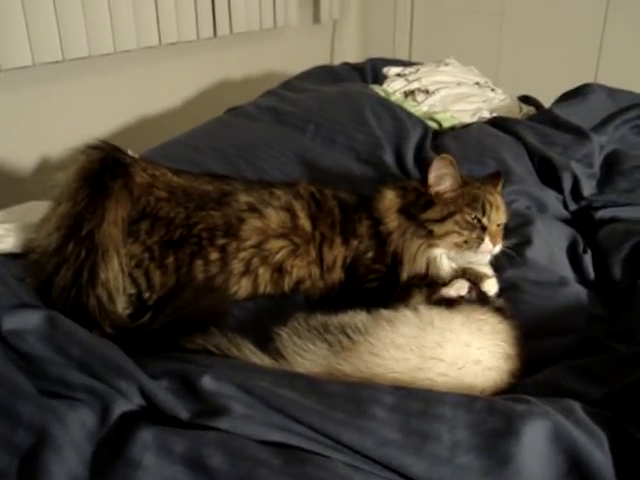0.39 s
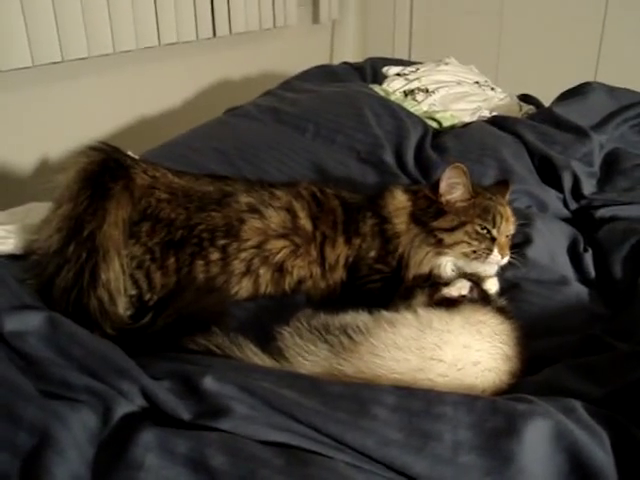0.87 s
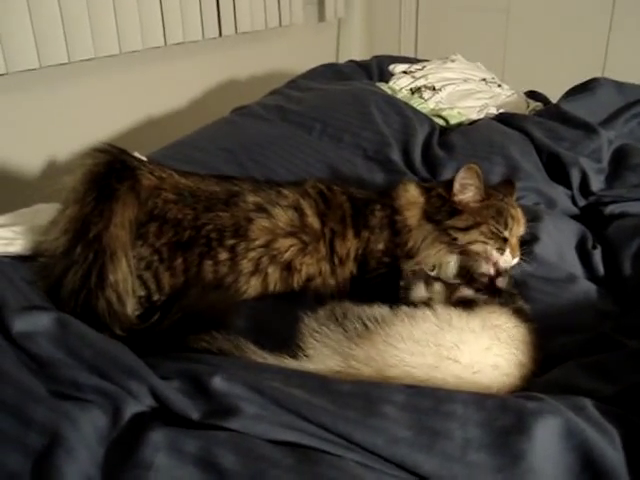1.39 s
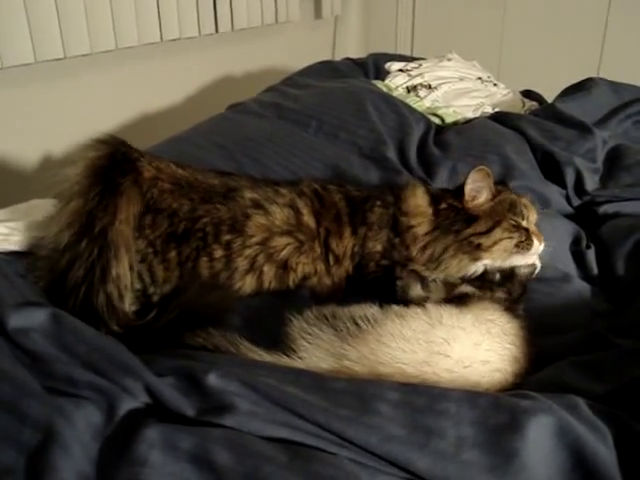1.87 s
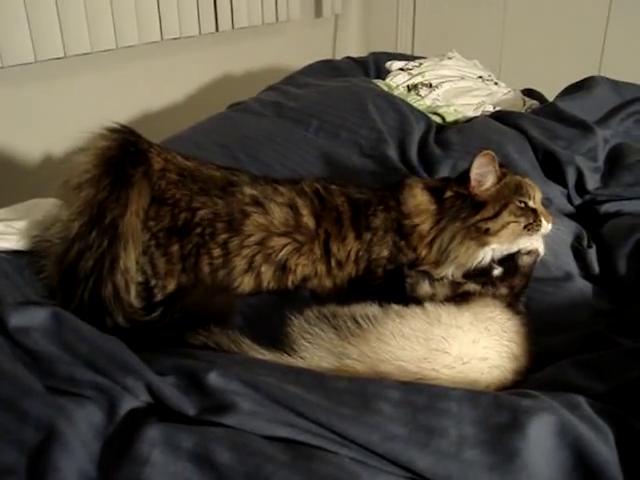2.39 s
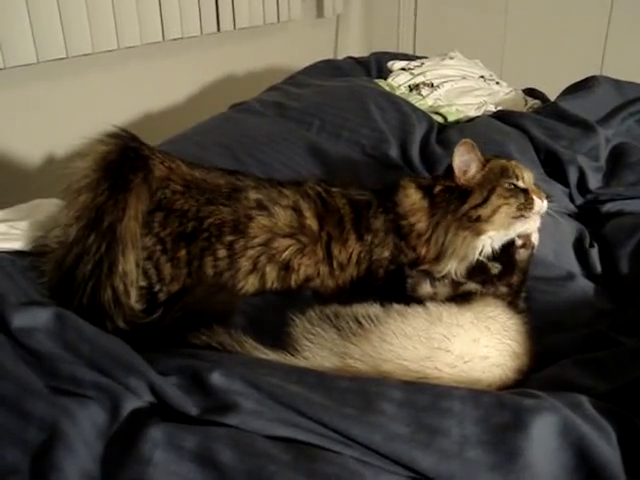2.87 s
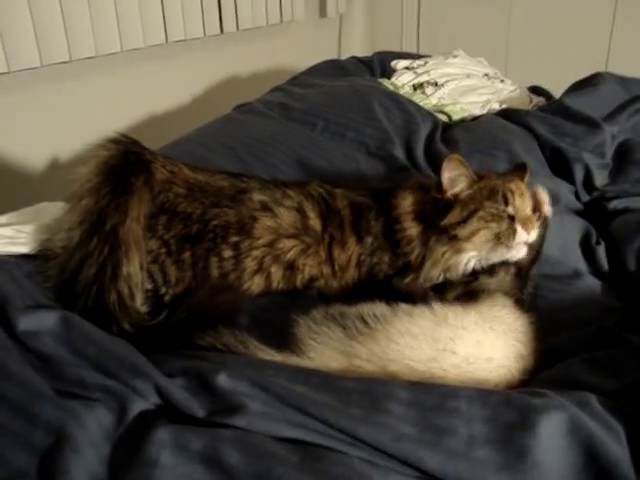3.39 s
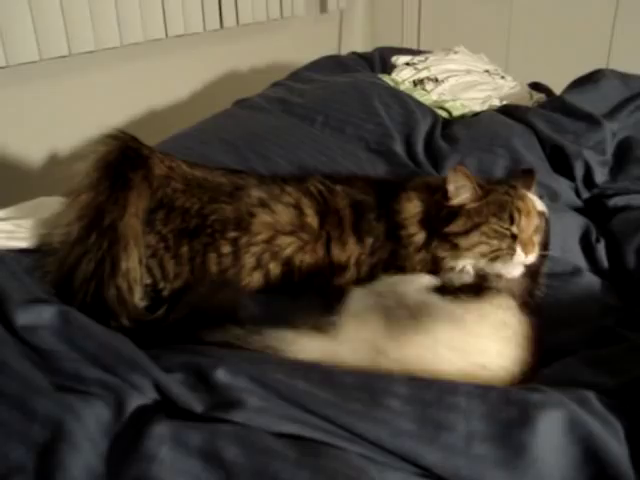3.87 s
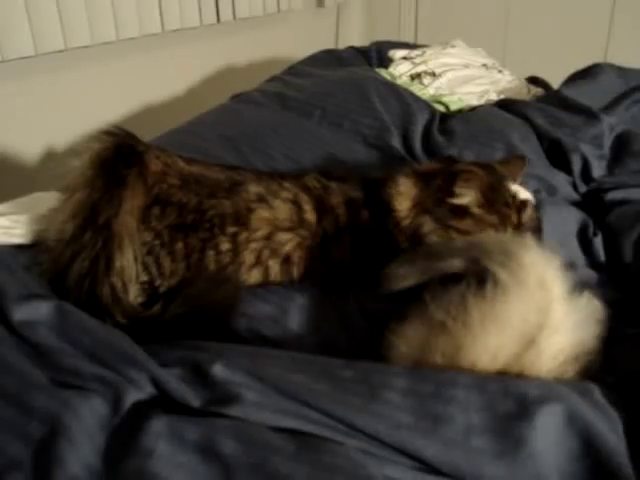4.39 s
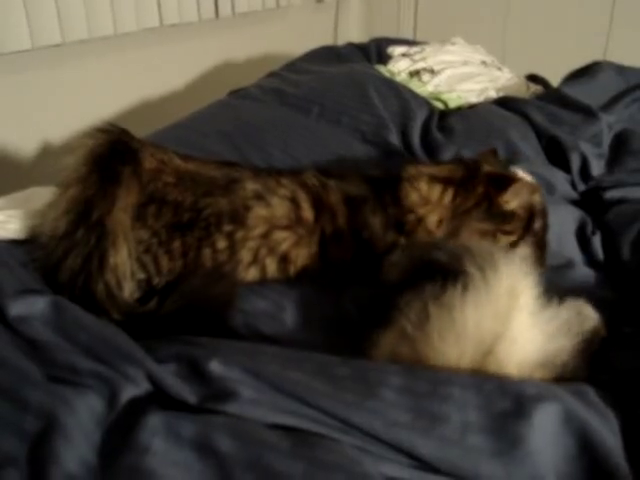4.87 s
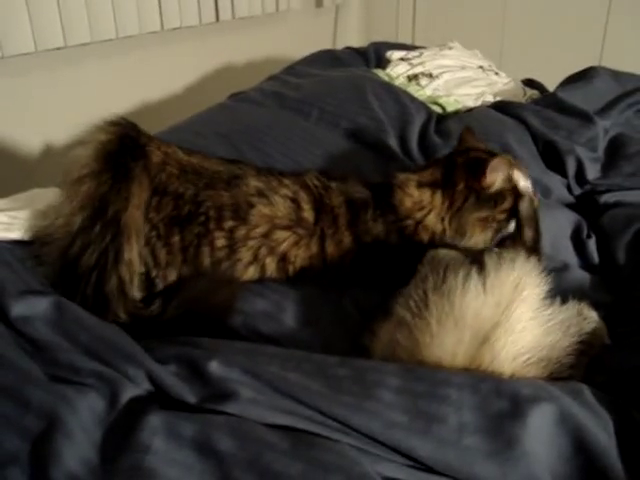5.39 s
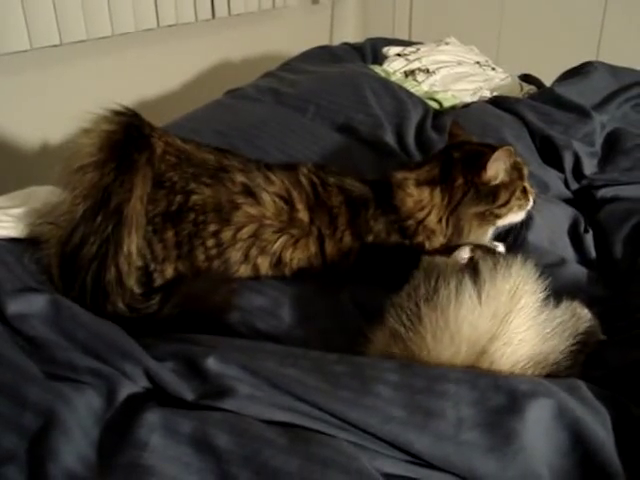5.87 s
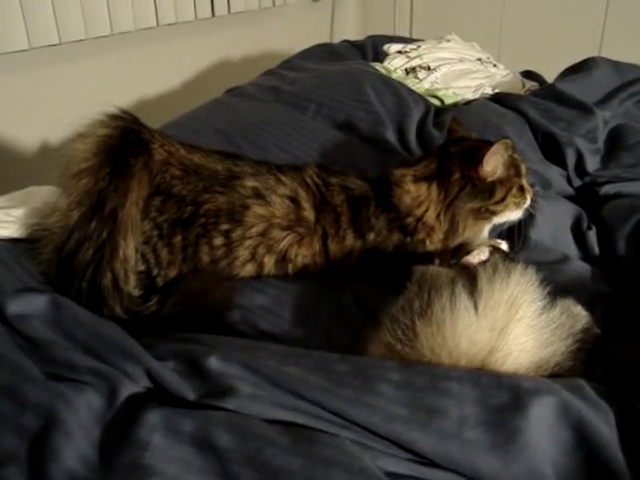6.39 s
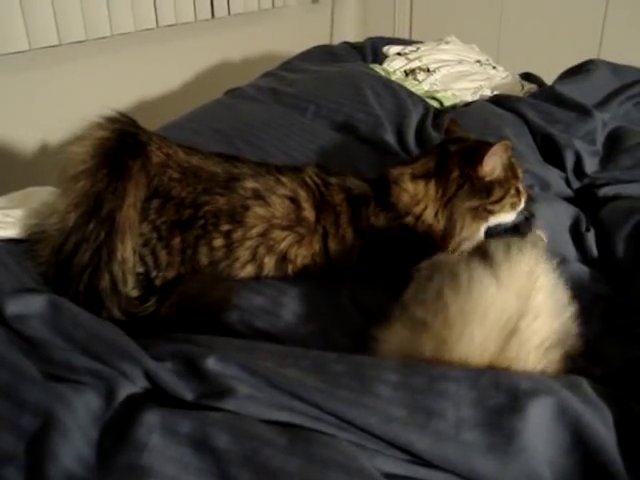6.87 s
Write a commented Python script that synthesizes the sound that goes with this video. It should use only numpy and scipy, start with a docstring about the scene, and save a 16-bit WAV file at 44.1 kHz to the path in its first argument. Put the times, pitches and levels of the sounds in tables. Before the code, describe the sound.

Sharp plastic clicks and knocks of a handled camera over soft hiss, then a cat gives two short trilled calls in a quiet bedroom.

```python
"""Room rumble, camera hiss and buzz lie under everything, with faint wavering bands: coloured noise and sines.
From the start a hand shifts on the plastic camera body: sharp clicks excite its resonances, fingers slide,
loose parts rattle, and two blows set a small metal part ringing.
Then a cat on a bed gives two short trilled calls, built from harmonics and breath noise, in a quiet room.
Between the calls and after them the bedding rustles in bursts of grainy noise."""
import sys
import numpy as np
from scipy import signal
from scipy.fft import rfft, irfft, next_fast_len
from scipy.io import wavfile
from scipy.ndimage import map_coordinates

SR = 44100
rng = np.random.default_rng(int(sys.argv[2]) if len(sys.argv) > 2 else 0)


def attenuation_scalar(level_db):
    """Turn a level in dB into a linear amplitude multiplier (20 dB per decade)."""
    decades = np.asarray(level_db, float) / 20
    return 10 ** decades


def wav_out(sig):
    """Save sig, one row per channel (or a flat mono array), as 16-bit PCM at SR to the path in sys.argv[1]."""
    wavfile.write(sys.argv[1], SR, np.round(np.clip(np.atleast_2d(sig).T, -1, 1) * 32767).astype(np.int16))


N = 319697
T = np.arange(N) / SR  # time of each sample in seconds
SLIDE_RISE_S, SLIDE_FALL_S = 0.0021, 0.006  # slides and rattles: seconds per 20 dB
THROAT_RISE_S, THROAT_FALL_S = 0.026, 0.027  # rough throat sounds: seconds per 20 dB


def unit(x):
    """Scales a sound to an rms of 1."""
    return x / np.sqrt(np.mean(x ** 2) + 1e-20)


def curves(rows):
    """Draws straight lines between the rows: one curve for each column after the time."""
    s, *cols = np.transpose(rows)
    return [np.interp(T, s, c) for c in cols]


def wobble(rate):
    """A smooth random curve through `rate` random points a second."""
    points = rng.standard_normal(int(N * 200 / SR) + 4)
    return map_coordinates(points, [T * rate])


def filtered(x, response):
    """Multiplies the spectrum of x by a response that depends on frequency."""
    m = next_fast_len(N + 8192)  # room at the end for the filter to ring out
    return irfft(rfft(x, m) * response(np.fft.rfftfreq(m, 1 / SR)), m)[:N]


def noise(spectrum):
    """Noise of rms 1, coloured by points of (Hz, dB)."""
    f, level = np.transpose(spectrum)

    def colour(hz):
        return attenuation_scalar(np.interp(np.log(hz + 1), np.log(f + 1), level))

    return unit(filtered(rng.standard_normal(N), colour))


def resonant(x, peaks):
    """Adds up (Hz, width, dB) resonances; neighbours alternate in sign, so no notch opens between them."""
    def response(f):
        return sum((-1) ** k * attenuation_scalar(db) * 1j * f * w / (c * c - f * f + 1j * f * w)
                   for k, (c, w, db) in enumerate(peaks))

    return filtered(x, response)


def twice(x, peaks):
    """Passes x through the resonances twice, so the sides of each peak fall steeply."""
    return resonant(resonant(x, peaks), peaks)


def strokes(rows, rise_s, fall_s):
    """Gain of (start, length, dB) strokes that swell, hold and fade; the times are for 20 dB."""
    gain = 0
    for s, length, db in rows:
        steps_away = np.maximum((s - T) / rise_s, (T - s - length) / fall_s)
        gain = gain + attenuation_scalar(db - 20 * np.maximum(0, steps_away))
    return gain


def hiss():
    """Room rumble and microphone hiss: coloured noise whose level drifts slowly."""
    # Colour of the noise. Each row: frequency in Hz, relative level in dB.
    floor = [(12, -34), (20, -8), (86, -5.5), (115, -2.5), (146, -4.5), (199, -3.5), (295, -3.5), (582, 0),
             (2330, -15.5), (2870, -17.5), (4590, -17.5), (5660, -18), (7350, -19), (8160, -19.5),
             (10300, -22.5), (13400, -77), (22000, -120)]
    return attenuation_scalar(-52.5 + 0.72 * wobble(3.153)) * noise(floor)


def buzz():
    """The camera electronics hum at multiples of the frame rate, each tone wavering a little."""
    frame_hz = 29.97
    # Tones of the electronics. Each row: multiple of the frame rate, rms level in dB before the wavering.
    tones = [(4, -71), (5, -80), (7, -71), (8, -68), (9, -69), (260, -88), (261, -82), (262, -73),
             (263, -74), (264, -83), (266, -89), (268, -86), (269, -87), (270, -79), (271, -69), (272, -84),
             (273, -86)]
    total = 0
    for k, db in tones:
        level = np.sqrt(2) * attenuation_scalar(db + 0.34 * wobble(9.0))
        total = total + level * np.sin(2 * np.pi * (k * frame_hz * T + rng.random()))
    return total


def whirr():
    """Faint narrow bands of noise that waver."""
    # Narrow bands. Each row: frequency in Hz, width of one filter pass in Hz, level in dB before the wavering.
    bands = [(2560, 260, -74), (2930, 330, -71), (3790, 300, -73)]
    total = 0
    for hz, width, db in bands:
        band = unit(twice(rng.standard_normal(N), [(hz, width, 0)]))
        total = total + attenuation_scalar(db + 3.1 * wobble(7.4)) * band
    return total


def flutter():
    """A thin band of noise comes and goes in flickering spells."""
    # Spells of the band. Each row: start in seconds, length in seconds, level in dB before the flicker.
    spells = [(0.32, 0.089, -69), (0.92, .3, -75), (1.45, 0.11, -67), (2.27, 0.26, -69), (2.75, 0.12, -69),
              (3.1, .33, -68), (3.56, 0.43, -69), (4.09, .3, -67.5), (4.46, .2, -73), (4.85, 0.41, -68),
              (5.4, 0.34, -69.5), (6.2, 0.24, -70), (6.55, 0.31, -68), (7.1, .15, -74)]
    # The thin band. Each row: frequency in Hz, width of one filter pass in Hz, level in dB.
    thin = [(5740, 230, 0)]
    edge_s = 0.11  # seconds per 20 dB
    flicker = attenuation_scalar(2.7 * wobble(30))
    return strokes(spells, edge_s, edge_s) * flicker * unit(twice(rng.standard_normal(N), thin))


def click_forces():
    """Each click is a snap with a short gritty tail; faint noise is heard swelling just before it."""
    # Clicks of the hand on the camera. Each row: time in seconds, force in dB, then levels over
    # the force in dB of shell, hollow knock and bright crack.
    hits = [(0.2273, -43, -5, 3, -20), (0.2347, -45, 8, -3, -11), (0.2407, -35, -3, -6, 12.5),
            (0.244, -35.5, -4, 0, -8), (0.246, -36, 0, -1, 3), (0.2492, -42, 4, 2, -20),
            (0.3181, -42.5, -12, 1, -25), (0.516, -47, -14, 15, -3), (0.6206, -32, -0.5, -3, -8),
            (0.735, -30.5, -13, -4, -24), (1.2336, -41.5, -2, -6, 4), (1.2377, -43, 2, -13, 3),
            (1.2423, -45, 5, 3, 13), (1.2567, -40, -8, 1.5, -10), (1.282, -49, 4, -10, 3),
            (1.2922, -54, 7, -10, -4), (1.3097, -47, -16, 12, -6), (1.3266, -39, -30, 4, -25),
            (1.3342, -37, -2, 3, -28), (1.3424, -20.5, 7, -6.5, 9), (1.358, -20.5, 9.5, -0.5, 11.5),
            (1.3637, -24, -10, -4, -35), (1.4523, -43.5, 4, -8, -4), (1.647, -37, -2, -3, -9),
            (1.662, -33.5, -5, -9, -3.5), (1.915, -25, 1.5, -6.5, -3), (2.0358, -45.5, 9, -18, 17),
            (2.0395, -27.5, 1, -6, -10), (2.2151, -22, -20, -1, -5.5), (2.2195, -20, -14, -6, -8),
            (2.2233, -24, 0, -9, 9.5), (2.229, -51, 0, -1, -25), (2.2345, -58, -10, 7, -25),
            (2.2385, -57, -13, -4, -25), (2.2435, -54, 0, 7, -25), (2.2465, -50.5, -12, 15, -25),
            (2.2535, -48, -14, -8, -23), (2.308, -42.5, -27, 12.5, -23), (2.328, -51, -22, 16, -20),
            (2.3505, -53.5, -13, 15.5, -10), (3.3345, -53, 7.5, -12, -6), (3.4504, -49, 2, 11.5, 3),
            (3.4552, -42, 4, -7, 10.5), (3.4643, -42, 6, -10, 4), (3.472, -41, 3, 4, 2),
            (3.4872, -30, 0, -1, -8), (3.4903, -26, 7, -0.5, 5), (3.5087, -20.5, -21, -4.5, -11),
            (3.5326, -32, -5, -10, -8), (3.8351, -30, 1, -6, -9)]
    # Gritty tail, for hollow, rim, shell and bright edge: start level under the snap in dB.
    grit_db = [-22, -16.5, -23, -16.5]
    # The same four parts: time in seconds for the tail to fall by 60 dB.
    grit_t60 = [0.036, 0.02, 0.016, 0.0091]
    force = np.zeros((4, N + SR))
    t = np.arange(SR // 16) / SR
    early = SR // 200  # samples of faint noise heard ahead of the snap
    after = t - early / SR
    tail = attenuation_scalar(grit_db)[:, None] * attenuation_scalar(-60 * after / np.array(grit_t60)[:, None])
    pre_echo = 0.04 * attenuation_scalar(20 * after / 0.003)  # swells by 20 dB in 3 ms
    noise_gain = np.where(after > 0, tail, pre_echo)
    for s, db, shell_db, hollow_db, bright_db in hits:
        levels = db + np.array([hollow_db, 0, shell_db, bright_db])
        snap = noise_gain * rng.standard_normal(len(t)) - (after == 0)
        force[:, round(s * SR) - early:][:, :len(t)] += attenuation_scalar(levels)[:, None] * snap
    return force[:, :N]


def camera_body(force):
    """The forces ring the hollow, rim, shell and bright edge; the hollow also rings on in its cavity."""
    # Resonances of the hollow inside, the rim, the shell, the bright edge and the cavity.
    # Each row: frequency in Hz, width in Hz, level in dB (hollow and rim: for one of two filter passes).
    hollow = [(753, 526, -1.5), (1326, 505, -1.5)]
    rim = [(2080, 2020, 0)]
    shell = [(2720, 180, 0), (3200, 800, -6), (3850, 500, -8)]
    bright = [(4700, 850, 5.5), (6700, 1190, 4), (8620, 1300, 0.5)]
    cavity = [(1090, 110, 0)]
    cavity_db = -9
    blow = 1. * (np.arange(N) == 0)  # a single-sample blow, to scale each response to a peak of 1
    parts = (twice, hollow), (twice, rim), (resonant, shell), (resonant, bright)
    out = 0
    for push, (ring, peaks) in zip(force, parts):
        out = out + ring(push, peaks) / np.abs(ring(blow, peaks)).max()
    ring_on = resonant(force[0], cavity) / np.abs(resonant(blow, cavity)).max()
    return out + attenuation_scalar(cavity_db) * ring_on


def finger_slides(grains):
    """Sliding fingers drive the same four body parts with grainy noise."""
    # Slides. Each row: start in seconds, length in seconds, level in dB before the shares below.
    rubs = [(1.232, 0.014, -52), (1.346, 0.01, -59), (2.029, .008, -56), (2.216, 0.008, -46),
            (2.306, .006, -75), (3.453, 0.025, -52), (3.485, 0.0041, -49), (3.495, 0.053, -61)]
    shares = [[.1], [.3], [.18], [.06]]  # for hollow, rim, shell and bright edge
    return strokes(rubs, SLIDE_RISE_S, SLIDE_FALL_S) * grains * shares


def thumps():
    """Pushes on the body: a pressure pulse that rises, then dies away through a slow swing."""
    # Pushes. Each row: start in seconds, approximate peak in dB, rise time in seconds.
    pushes = [(1.342, -27, 0.00053), (2.2233, -22.5, 0.00083), (2.225, -43, 0.0056), (2.235, -53, .02)]
    t = np.arange(SR // 16) / SR
    out = np.zeros(N + SR)
    for s, db, rise in pushes:
        pulse = t / rise * np.exp(1 - t / rise) * np.cos(0.21 * t / rise)
        out[round(s * SR):][:len(t)] += attenuation_scalar(db) * pulse
    return out[:N]


def metal_part():
    """A small metal part is struck and rings in fading sine tones."""
    # Strikes on the metal. Each row: time in seconds, level in dB.
    strikes = [(1.363, -39.5), (3.508, -40.5)]
    # Tones of the metal. Each row: frequency in Hz, level over the strike in dB, seconds to fall by 60 dB.
    modes = [(1328, 0, .4), (2654, -22, .3)]
    t = np.arange(SR // 2) / SR
    out = np.zeros(N + SR)
    for s, db in strikes:
        ping = sum(attenuation_scalar(level - 60 * t / t60) * np.sin(2 * np.pi * hz * t) for hz, level, t60 in modes)
        out[round(s * SR):][:len(t)] += attenuation_scalar(db) * ping * (1 - np.exp(-t / 0.00097))  # soft onset
    return out[:N]


def loose_parts(grains):
    """Loose parts rattle after a heavy knock: grainy noise through two resonances."""
    # Rattles. Each row: start in seconds, length in seconds, rms level in dB.
    shakes = [(1.367, .016, -44), (2.227, .029, -47), (3.494, .012, -46), (3.512, .012, -51)]
    # Resonances of the parts. Each row: frequency in Hz, width in Hz, level in dB, for one of two passes.
    band = [(2150, 700, 0), (3700, 500, -3)]
    return strokes(shakes, SLIDE_RISE_S, SLIDE_FALL_S) * unit(twice(grains, band))


def handling():
    """The hand on the camera: clicks and slides ring the body, with thumps, metal and rattles."""
    grains = unit(attenuation_scalar(5 * wobble(190)) * rng.standard_normal(N))  # shared by slides and rattles
    body = camera_body(click_forces() + finger_slides(grains))
    return body + thumps() + metal_part() + loose_parts(grains)


def cat():
    """Vocal fold harmonics; a trill shakes pitch and strength, and an open mouth lifts the overtones."""
    # The calls, one list each. Each row: time in seconds, pitch in Hz before the trill, effort in dB,
    # mouth opening in dB, breathiness in dB over the effort.
    meows = [
        [(4.088, 611, -64, -2, -12), (4.098, 618, -51.5, 1, -9), (4.125, 586.4, -56, 5.5, -8),
         (4.15, 574, -41.5, -10, -18), (4.182, 563, -48.5, -2, -13), (4.203, 636.5, -52.5, -6, -14),
         (4.229, 653, -56, 2, -9), (4.235, 532, -44, -3, -13), (4.25, 525, -49.5, 1, -15),
         (4.262, 465, -45.5, 2, -28), (4.29, 498, -48, -1, -21), (4.302, 483, -46, -2, -20),
         (4.308, 418, -43.5, -4, -18), (4.365, 434.4, -45, 2, -17), (4.398, 458, -44, -4, -24),
         (4.418, 425, -40.5, -9, -28), (4.438, 437, -43, -6, -29), (4.452, 418, -60, -4, -15),
         (4.473, 428, -46.5, -8, -28), (4.5, 420, -62, -11, -14)],
        [(5.228, 638, -62, -16, -12), (5.242, 656, -46, -16, -12), (5.25, 532, -47, -8, -15),
         (5.266, 491, -43.5, -13, -19), (5.3, 489, -48, -3, -15), (5.35, 486.4, -39, -10, -18),
         (5.4, 488.6, -46.5, -1.5, -22), (5.434, 479.5, -35.5, -16, -24), (5.462, 489.5, -45.5, 1, -22),
         (5.49, 483, -36, -8, -32), (5.508, 448, -44, 2, -13), (5.518, 482.6, -40, -8, -20),
         (5.528, 471.7, -51, 7.5, -7), (5.56, 475.3, -42, 0.5, -18), (5.594, 476.7, -38.5, -8, -23),
         (5.62, 488.6, -37.5, -6, -14), (5.636, 437, -40.5, -8, -16), (5.652, 516, -38, -17, -15),
         (5.672, 521, -36, -21, -19), (5.7, 521, -42, -19, -15), (5.712, 520, -55, -25, -11),
         (5.725, 540, -58, -28, -4)],
    ]
    # Beats a second (Hz) of the trill in the throat, one for each call.
    trills = [34.9, 42.14]
    # Depth of the trill in dB added by each harmonic, one for each call.
    trill_depths = [0, 1.1]
    # Nasal colour, one list per call. Each row: time in seconds, lift of the 3rd and of the 4th harmonic in dB.
    nasal_rows = [
        [(4.09, 1, 11), (4.14, -8, -1), (4.17, -3, 3), (4.22, 1, 2), (4.25, -4, 3), (4.32, -1.5, -3),
         (4.41, -5, -3), (4.46, -11, -3)],
        [(5.25, -9, -6), (5.32, -10, -6), (5.38, -1, -1), (5.44, -1.5, -5), (5.49, 2.5, -2), (5.56, 1, -1),
         (5.63, -3, 0), (5.68, 1, 3)],
    ]
    # Phase roughness in radians, growing with the harmonic number, one for each call.
    jitters = [.1, .22]
    # Overtones from the 2nd up. Each row: level over the effort in dB, dB gained per dB of mouth opening,
    # dB gained per dB of breathiness.
    overtones = [(0, 1, 0), (-9.5, .7, 0), (-14, .6, .6)]
    # Breath resonances of the throat. Each row: frequency in Hz, width in Hz, level in dB, for one of two passes.
    throat = [(950, 250, 7.5), (1690, 120, 0), (2610, 260, 2.5), (4600, 1400, -3)]
    # Mouth wide open. Each row: start in seconds, length in seconds, level in dB before the roughness.
    wide = [(5.45, .06, -73), (5.54, .085, -68)]
    lag_rad = .22  # harmonic k lags by this times k squared
    breath = unit(twice(rng.standard_normal(N), throat))
    voice = np.zeros(N)
    for rows, trill_hz, trill_db, nasal, jitter in zip(meows, trills, trill_depths, nasal_rows, jitters):
        hz, effort_db, open_db, airy_db = curves(rows)
        beat = 2 * np.pi * trill_hz * (T - rows[0][0])
        sounding = (T > rows[0][0]) & (T < rows[-1][0])
        shaken_hz = hz * (1 + 0.018 * np.cos(beat + 0.59) + 0.00335 * wobble(120))
        phase = 2 * np.pi * np.cumsum(shaken_hz) / SR
        levels = [effort_db]
        levels += [effort_db + db + opens * open_db + airs * airy_db for db, opens, airs in overtones]
        levels[2:] = np.add(levels[2:], curves(nasal))
        for k, db in enumerate(levels, 1):
            throb_db = (1.2 + trill_db * k) * np.cos(beat) + .8 * k * wobble(60)
            roughness = jitter * (k - 1) * k / 2 * wobble(110)
            tone = np.cos(k * phase - lag_rad * k * k + roughness)
            voice += sounding * np.sqrt(2) * attenuation_scalar(db + throb_db) * tone
        # rough 9th and 10th harmonics
        shine = sum(np.cos(k * phase + 1.3 * wobble(190)) for k in (9, 10))
        wide_gain = strokes(wide, THROAT_RISE_S, THROAT_FALL_S) * attenuation_scalar(4.9 * wobble(170))
        voice += sounding * wide_gain * shine
        puffs = 1 + .9 * np.cos(phase)  # air puffs once a cycle
        voice += sounding * attenuation_scalar(effort_db + airy_db) * breath * puffs
    return voice


def room(x):
    """A soft-furnished bedroom adds a short diffuse tail: fading noise convolved with the sound."""
    t60_s, tail_db = .22, -13
    t = np.arange(SR // 3) / SR
    tail = rng.standard_normal(len(t)) * attenuation_scalar(-60 * t / t60_s) * (t > .004)  # starts after 4 ms
    return x + attenuation_scalar(tail_db) * signal.fftconvolve(x, tail / np.linalg.norm(tail))[:N]


def bedding():
    """Cloth rubs in soft grainy bursts of coloured noise."""
    # Bedding moves. Each row: start in seconds, length in seconds, level in dB.
    moves = [(4.97, 0.12, -58.5), (6.83, .06, -56.5), (6.955, 0.061, -55.5), (6.985, 0.016, -51)]
    # Colour of the cloth noise. Each row: frequency in Hz, relative level in dB.
    cloth = [(300, -30), (550, -6), (800, 0), (1150, -5), (1600, -14), (3000, -26), (11000, -60)]
    rise_s, fall_s = 0.02, 0.041  # seconds per 20 dB
    return strokes(moves, rise_s, fall_s) * unit(attenuation_scalar(0.75 * wobble(190)) * noise(cloth))


def throat_rasp():
    """The cat's throat rasps in the second call: a narrow band of uneven noise."""
    # Rasps. Each row: start in seconds, length in seconds, level in dB.
    bursts = [(5.496, 0.022, -51), (5.54, .02, -58), (5.625, 0.058, -55)]
    # The rasp's band. Each row: frequency in Hz, width of one filter pass in Hz, level in dB.
    band = [(1780, 110, 0)]
    rasp = unit(attenuation_scalar(4.7 * wobble(45)) * twice(rng.standard_normal(N), band))
    return strokes(bursts, THROAT_RISE_S, THROAT_FALL_S) * rasp


def scene():
    """Steady noise under the hand on the camera, the cat in the room and the bedding."""
    background = hiss() + buzz() + whirr() + flutter()
    cat_in_room = room(cat() + throat_rasp())
    return (background + handling() + cat_in_room + bedding())[None]


def top_cut(x):
    """Nothing passes above the cut-off."""
    return signal.sosfilt(signal.butter(12, 10470, fs=SR, output="sos"), x)


def record(dry):
    """The camera keeps next to nothing above its band limit."""
    top_hz = 9987
    kept = filtered(dry[0], lambda hz: 1 / (1 + (hz / top_hz) ** 90))
    return top_cut(kept[None])


dry = scene()
out = record(dry)
wav_out(out)
```